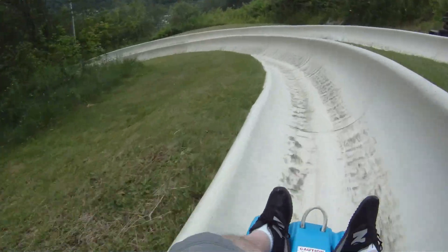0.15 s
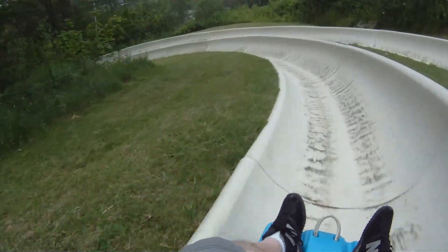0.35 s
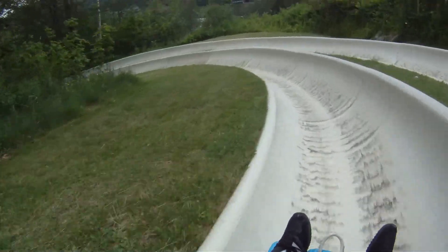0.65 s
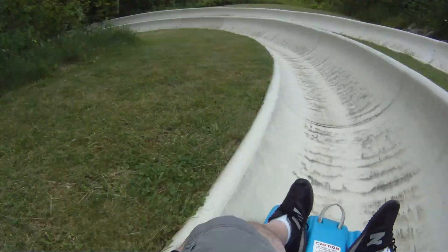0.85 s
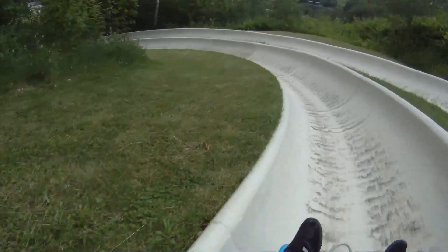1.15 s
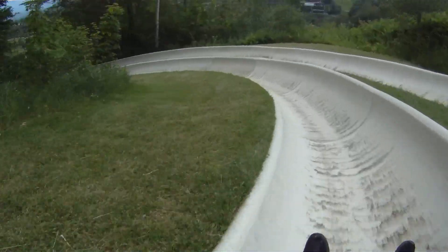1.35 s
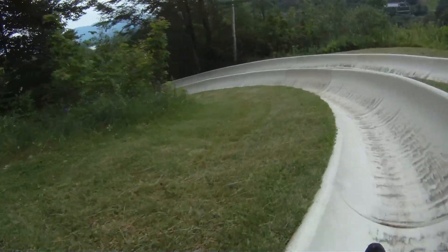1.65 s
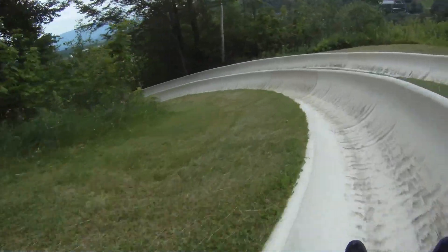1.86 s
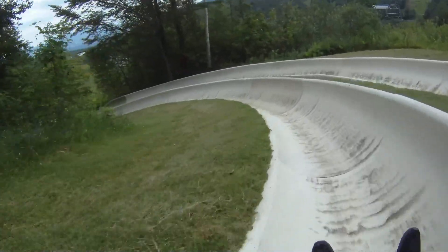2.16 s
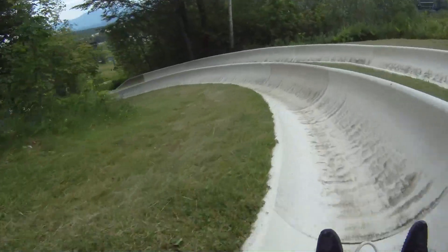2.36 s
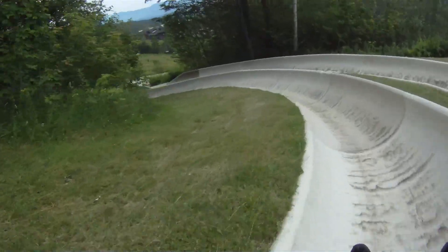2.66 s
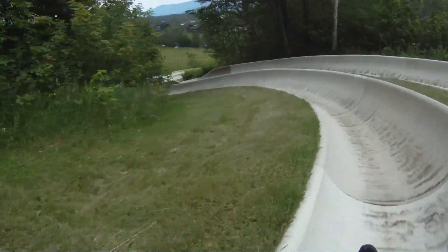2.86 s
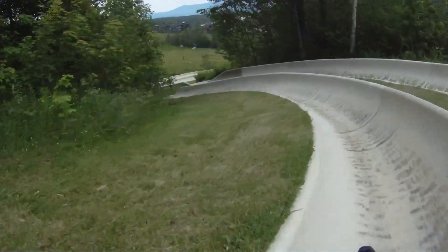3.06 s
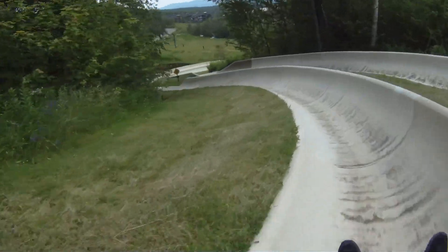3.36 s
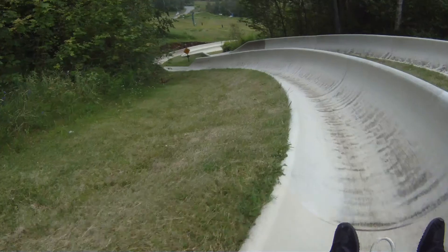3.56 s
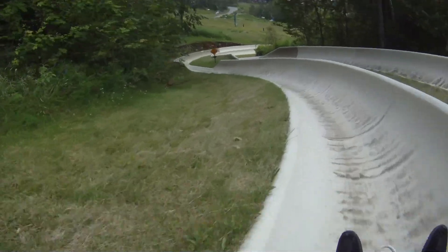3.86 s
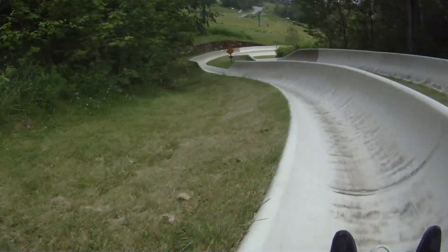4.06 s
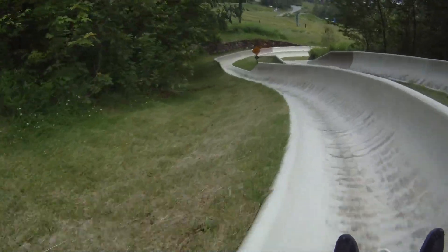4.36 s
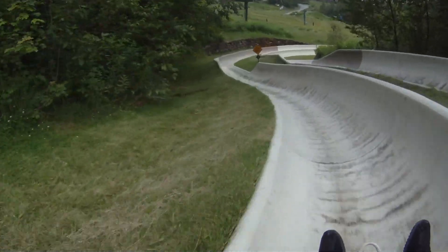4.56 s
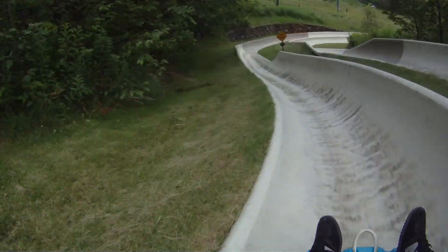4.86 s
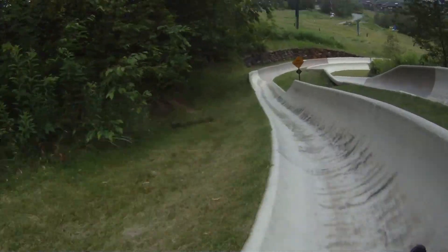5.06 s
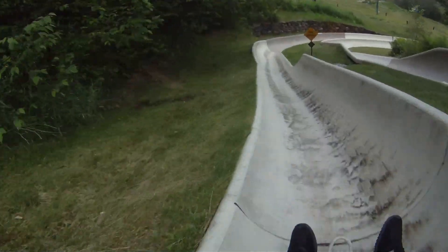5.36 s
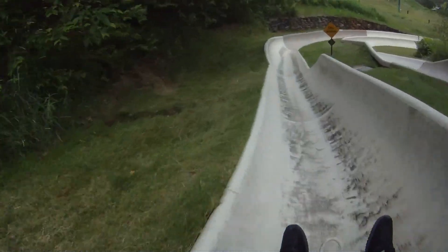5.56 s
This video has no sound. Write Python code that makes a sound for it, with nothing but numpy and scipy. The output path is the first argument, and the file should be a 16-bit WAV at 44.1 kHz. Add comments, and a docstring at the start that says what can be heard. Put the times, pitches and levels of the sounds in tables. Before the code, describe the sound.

A plastic sled scrapes along a concrete chute, knocking and clattering over evenly spaced joints.

```python
"""A plastic sled on a banked concrete chute in the open air, the microphone close, at the rider's seat.
From the start the runners scrape, coloured by the hollow shell. At each track joint, about 0.6 s apart,
the nose knocks; a tenth of a second later the tail thuds, the sled bounces and scrapes harder, and
loose parts clack. Grit ticks between the joints and three times a runner rubs the wall.
The last two knocks are softer, with no clacks after them."""
import sys
import numpy as np
from scipy import signal
from scipy.fft import rfft, irfft
from scipy.io import wavfile
from scipy.ndimage import uniform_filter1d

SR = 44100
rng = np.random.default_rng(int(sys.argv[2]) if len(sys.argv) > 2 else 0)


def generate_wav(sig):
    """Save sig (samples, or channels by samples) to the path in sys.argv[1] as 16-bit PCM at SR."""
    pcm = np.round(np.clip(np.atleast_2d(sig).T, -1, 1) * 32767).astype(np.int16)
    wavfile.write(sys.argv[1], SR, pcm)


N = 251370
TIME = np.arange(N) / SR
BLOW_T = np.arange(int(.2 * SR)) / SR  # time within one blow [s]

# the tail drops over a joint, levels relative:
# (time [s], thud [dB], rattle [dB], rattle pitch [Hz], bounce [dB])
TAIL_DROPS = [(0.123, -28.5, -33, 1920, -36.5), (0.732, -32, -42, 1880, -52),
              (1.414, -32, -34.5, 2100, -38.5), (2.069, -27.5, -31, 2000, -42.5),
              (2.695, -33.5, -37.5, 2160, -39.5), (3.306, -27.5, -28.5, 2170, -42.5),
              (3.895, -24.5, -33.5, 2470, -35.5), (4.483, -25, -28.5, 2520, -41.5),
              (5.192, -34.5, -30, 2490, -46), (5.679, -31.5, -39, 2120, -52)]


def nose_knocks(lag=0.0018, thud_db=-21, knock_db=-21, crack_db=-24, buzz_db=-25, thud_growth=1.65):
    """The nose hits each joint hard: the hollow modes ring, the shell cracks and the plastic buzzes."""
    # blows on the nose: (time [s], strength [dB re a typical joint])
    joints = [(0.014, -1), (0.644, -17), (1.307, 0.1), (1.968, 0), (2.597, 0), (3.211, 0.5), (3.802, 1.1),
              (4.39, 1.2), (5.008, -9.5), (5.586, -19.5)]
    out, shell = np.zeros(N), shell_response(ring_db=5.5)
    contact = 1 + .7 * np.exp(-(BLOW_T / .005) ** 4)  # strongest while the nose is still on the edge
    for s, db in joints:
        thud, knock = body_modes(contact_hz=1780, scatter=0.2, damping=0.79)
        thud = band(thud, 125, "high")  # the light nose hardly moves the whole sled
        crack = chatter(shell, rise=0.0018, t60=0.056, tail_db=-17, tail_t60=0.13, thin_hz=1180)
        buzz = chatter(shell, rise=0.0017, t60=0.074, tail_db=-8, tail_t60=0.077, thin_hz=387)
        buzz = undb(buzz_db) * unit_blow(band(buzz, 1230, "low"))
        strike = undb(knock_db) * unit_blow(contact * knock) + undb(crack_db) * unit_blow(contact * crack)
        thud_gain = undb(thud_db + thud_growth * db)  # only hard blows reach the low modes
        add(out, s + lag, thud_gain * thud + undb(db) * (strike + buzz))
    return out


def tail_thuds(lag=0.00063, rattle_lag=0.0022, knock_db=-19, hard_db=-29, hard_rise=0.0025):
    """The tail lands soft and heavy, damped by the rider; the seat shudders and the shell rattles."""
    out, shell = np.zeros(N), shell_response(ring_db=-4.5)
    for s, thud_db, rattle_db, hz, _ in TAIL_DROPS:
        thud, knock = body_modes(contact_hz=171, scatter=0.94, damping=1.44)
        shudder = chatter(shell, rise=0.0016, t60=0.17, tail_db=-20, tail_t60=0.14, thin_hz=79)
        shudder = unit_blow(band(shudder, 446, "low"))
        rise = hard_rise * 2 ** ((hard_db - rattle_db) / 8)  # 8 dB weaker builds half as fast
        rattle = chatter(shell, rise=rise, t60=0.063, tail_db=-14, tail_t60=0.15, thin_hz=770)
        rattle = tint(rattle, hz, boost_db=5)
        add(out, s + lag, undb(thud_db - 0.5) * thud + undb(thud_db - 4) * shudder)
        add(out, s + rattle_lag, undb(thud_db + knock_db) * knock + undb(rattle_db + 1.5) * rattle)
    return out


def clacks(lag=.0001, snap_hz=(2900, 5200), thud_db=-39, knock_db=-36, clack_db=-26.5, body_growth=0.41):
    """Loose parts land in light, bright chatter; the body's share grows more slowly than the blow."""
    # parts falling back: (time [s], strength [dB re a typical clack], pitch [Hz], snap boost [dB])
    falls = [(0.209, -6, 2280, 3.5), (0.232, -17, 1910, -16), (0.246, -10.5, 2190, 6),
             (0.825, -19, 2240, 1), (1.497, 0, 2130, -1.5), (1.536, -15.5, 2520, -11),
             (2.149, 5, 2270, -1.5), (2.771, 0, 2160, 3), (3.381, 0.5, 2240, -2.5), (3.969, 0.5, 1920, 2),
             (3.994, -10.5, 2230, -11), (4.559, -2, 2060, -1)]
    out, shell = np.zeros(N), shell_response(ring_db=-9)
    for s, db, hz, snap_db in falls:
        thud, knock = body_modes(contact_hz=920, scatter=1.0, damping=1.73)
        clack = chatter(shell, rise=0.0014, t60=0.044, tail_db=-26, tail_t60=0.49, thin_hz=1370)
        clack = tint(clack, hz, boost_db=5.5)
        clack = clack + (undb(snap_db) - 1) * band(clack, snap_hz, "band", order=1)
        body = undb(thud_db) * thud + undb(knock_db) * knock
        add(out, s + lag, undb(body_growth * db) * body + undb(clack_db + db) * clack)
    return out


def scrape(grains_per_s=380, grain_spread_db=3, split_hz=1600, press_growl_db=2, press_hiss_db=1.5):
    """Runners on rough concrete, just below the seat: coarse grains growl under a finer hiss."""
    # the slowly changing surface, levels relative: (time [s], growl [dB], hiss [dB])
    surface = [(0.0, -45, -47), (0.51, -48.5, -48), (1.33, -47.5, -48), (1.49, -49, -46),
               (3.08, -48.5, -48.5), (3.24, -46, -43.5), (3.48, -47.5, -49), (5.4, -47.5, -44),
               (5.7, -46, -47.5)]
    # the runners sing faintly: (pitch [Hz], width [Hz], boost [dB])
    runner_rings = [(2586, 56, 3), (3730, 70, 3), (5100, 320, 4)]
    s, growl_db, hiss_db = np.transpose(surface)
    shell = shell_response(ring_db=-48.5)
    hits = (rng.random(N) < grains_per_s / SR) * rng.choice([-1, 1], N)
    grains = unit(hits * undb(grain_spread_db * rng.exponential(size=N).clip(0, 4)))
    coarse = through(grains + undb(2.5) * rng.standard_normal(N), shell)
    fine = through(undb(-6) * grains + rng.standard_normal(N), shell)
    for hz, width, db in runner_rings:
        fine = tint(fine, hz, db, width)
    load_db = 1.03 * walk(24.75)  # the load on the runners flutters
    press = runner_press()
    growl_gain = undb(np.interp(TIME, s, growl_db) + 1 + press_growl_db * press + 0.65 * walk(61))
    hiss_gain = undb(np.interp(TIME, s, hiss_db) - 0.9 + press_hiss_db * press)
    growl = unit(band(coarse, split_hz, "low", order=3)) * growl_gain
    hiss = unit(band(fine, split_hz, "high", order=3)) * hiss_gain
    wall = wall_rubs(shell, split_hz)
    roughness_db = 1.14 * walk(90)  # the treble follows finer patches of the surface
    return (growl + (hiss + wall) * undb(roughness_db)) * undb(load_db)


def runner_press(full_db=-25.5):
    """Each tail drop briefly presses the runners onto the track, fully from a thud of full_db up."""
    return sum(min(undb(db - full_db), 1) * swell(s, attack=0.09, hold=0.033, release=0.058)
               for s, db, *_ in TAIL_DROPS)


def wall_rubs(shell, low_cut_hz, pitch_hz=2200):
    """Against the banked wall a runner rasps at a pitch of its own."""
    # brushes with the wall: (time [s], half length [s], level [dB])
    rubs = [(0.62, 0.045, -40.5), (0.853, 0.024, -41), (5.012, 0.079, -42.5)]
    rasp = band(through(rng.standard_normal(N), shell), low_cut_hz, "high")
    rasp = unit(tint(rasp, pitch_hz, boost_db=6, width_hz=490))
    return rasp * sum(undb(db) * np.exp(-((TIME - s) / half) ** 2) for s, half, db in rubs)


def grit(strays=120, stray_db=-42, stray_range_db=14, dull_hz=2600, bright_share=0.56):
    """Small ticks as the runners cross pits, with fainter stray grains between them."""
    # the clearest ticks under the runners: (time [s], level [dB])
    ticks = [(0.496, -46.5), (1.81, -43.5), (2.429, -43), (2.451, -42), (2.971, -42.5), (3.062, -37.5),
             (3.088, -44), (3.114, -44.5), (4.843, -44), (4.896, -42.5), (5.063, -41), (5.445, -41.5)]
    out, shell = np.zeros(N), shell_response(ring_db=-2)
    for s, db in ticks:
        tick = chatter(shell, rise=0.00033, t60=0.036, tail_db=-15, tail_t60=0.066, thin_hz=504)
        add(out, s, undb(db) * tick)
    for when, softness in rng.random((strays, 2)):
        tick = chatter(shell, rise=0.00035, t60=0.041, tail_db=-24, tail_t60=0.083, thin_hz=564)
        add(out, when * N / SR, undb(stray_db - stray_range_db * np.sqrt(softness)) * tick)
    return bright_share * out + (1 - bright_share) * band(out, dull_hz, "low", order=1)


def sway(low_hz=22, high_hz=35, rumble_db=-13, rumble_hz=105, lag=0.035, steady_db=-49):
    """The loaded sled bounces and rumbles after each tail drop, over a faint steady sway."""
    bounce = unit(band(rng.standard_normal(N), [low_hz, high_hz], "band", order=3))
    rumble = unit(band(rng.standard_normal(N), [low_hz, rumble_hz], "band"))
    jolts = sum(undb(db) * swell(s + lag, attack=0.039, hold=0.12, release=0.031)
                for s, *_, db in TAIL_DROPS)
    return (bounce + undb(rumble_db) * rumble) * np.hypot(undb(steady_db), jolts)


def body_modes(contact_hz, scatter, damping, split_hz=500, onset=0.00067):
    """One push rings the sled, as (thud, knock); scatter (0-1) is how unevenly blows land."""
    # low modes of the sled: (pitch [Hz], relative level [dB], t60 at damping 1 [s])
    modes = [(80, -33, 0.043), (117.8, -16.5, 0.15), (157, -2, 0.054), (236.4, -6, 0.081),
             (257.8, 1.5, 0.061), (268, -2, 0.013), (427, -13.5, 0.095), (542, -12, 0.046),
             (740, -3, 0.0082), (805, 7, 0.025), (1011, 2, 0.012), (1092, 1, 0.026), (1308, -1.5, 0.047),
             (1410, 2, 0.0061)]
    hz, db, t60 = np.transpose(modes)[:, :, None]
    size_luck, pitch_luck, phase_luck = scatter * rng.uniform(-1.29, 1, (3, len(modes), 1))
    size = undb(db + 8 * size_luck) / np.hypot(1, (hz / contact_hz) ** 2)  # soft contacts favour the bass
    fade = (1 - np.exp(-BLOW_T / onset)) * decay(t60 / damping)
    waves = size * fade * np.cos(2 * np.pi * hz * (1 + .06 * pitch_luck) * BLOW_T + 2 * phase_luck)
    low = hz[:, 0] < split_hz
    thud = band(waves[low].sum(0), 383, "low", order=3)
    knock = band(waves[~low].sum(0), [380, 1420], "band", order=4)
    return unit_blow(thud), unit_blow(knock)


def chatter(shell, rise, t60, tail_db, tail_t60, thin_hz):
    """A burst of tiny contacts that builds, dies fast and leaves a faint rattle in the shell."""
    build = 1 - np.exp(-(BLOW_T / rise) ** 2)
    fade = decay(t60) + undb(tail_db) * decay(tail_t60)
    contacts = rng.choice([-1, 1], len(BLOW_T)) * build * fade
    return unit_blow(through(band(contacts, thin_hz, "high"), shell))


def shell_response(ring_db, valley_db=-36, size=4096):
    """Impulse response of the plastic shell: broad resonances plus a share of its narrow rings."""
    # broad resonances: (centre [Hz], width [Hz], level [dB])
    resonances = [(87.5, 87, 4), (241, 165, 6), (457, 480, -2.5), (912, 430, 1.5), (1205, 291, 1),
                  (2034, 362, 0), (2475, 477, -1.5), (3505, 640, -9), (4590, 1140, -18.5), (7145, 910, -21),
                  (8405, 630, -15.5), (9630, 660, -11), (10760, 620, -20.5), (12600, 590, -22),
                  (14350, 630, -13)]
    # narrow rings that hard blows bring out: (centre [Hz], width [Hz], level [dB re ring_db])
    rings = [(2083, 110, 3), (2260, 70, -1), (2640, 70, -4), (3625, 90, -7), (8352, 90, -12),
             (9918, 130, -8), (10864, 90, -12), (11214, 100, -11), (11736, 40, -19), (12263, 45, -18),
             (12782, 100, -13), (13250, 100, -14), (14082, 130, -11), (14620, 100, -14)]
    f = np.arange(size // 2 + 1) * SR / size
    broad = sum(undb(db) ** 2 * .5 ** ((2 * (f - hz) / width) ** 2) for hz, width, db in resonances)
    narrow = sum(undb(db + ring_db) ** 2 / (1 + ((f - hz) / width) ** 2) ** 2 for hz, width, db in rings)
    cepstrum = irfft(np.log(undb(valley_db) ** 2 + broad + narrow) / 2)
    cepstrum[1:size // 2] *= 2  # folding the cepstrum makes the response causal
    cepstrum[size // 2 + 1:] = 0
    return irfft(np.exp(rfft(cepstrum)))


def tint(x, hz, boost_db, width_hz=330):
    """Each place of contact favours its own pitch."""
    peak = signal.lfilter(*signal.iirpeak(hz, hz / width_hz, fs=SR), x)
    return unit_blow(x + (undb(boost_db) - 1) * peak)


def swell(start, attack, hold, release):
    """An envelope that rises up to the start time, holds and dies away; all in seconds."""
    age = TIME - start
    return np.exp(np.minimum(age, 0) / attack - np.maximum(age - hold, 0) / release)


def decay(t60):
    """A blow's fade, 60 dB in t60 seconds."""
    return np.exp(-np.log(1000) * BLOW_T / t60)


def walk(rate_hz):
    """Smooth random wandering, rms 1."""
    k = int(SR / rate_hz)
    steps = np.repeat(rng.standard_normal(N // k + 1), k)
    return unit(uniform_filter1d(uniform_filter1d(steps, k), k)[:N])


def band(x, hz, kind, order=2):
    """Butterworth filter."""
    return signal.sosfilt(signal.butter(order, hz, kind, fs=SR, output="sos"), x)


def through(x, response):
    """Pass x through an impulse response."""
    return signal.fftconvolve(x, response)[:len(x)]


def undb(db):
    """Decibels to gain."""
    return 10 ** (np.asarray(db) / 20)


def unit(x):
    """Scale to rms 1."""
    return x / np.sqrt(np.mean(x ** 2))


def unit_blow(x):
    """Scale a blow to rms 1 over its first 30 ms."""
    return x / np.sqrt(np.mean(x[:int(.03 * SR)] ** 2))


def add(out, s, x):
    """Mix x in at time s."""
    i = max(int(s * SR), 0)
    out[i:i + len(x)] += x[:max(N - i, 0)]


def scene():
    """Mono, in the open air: every source rides with the microphone, so its distance holds."""
    return (nose_knocks() + tail_thuds() + clacks() + grit() + scrape() + sway())[None]


def record(dry):
    """The microphone at the seat rounds the very loudest peaks and cuts the top above 15.4 kHz."""
    rounded = dry / (1 + (dry / .9) ** 6) ** (1 / 6)
    return signal.sosfilt(signal.ellip(8, .2, 70, 15400, fs=SR, output="sos"), rounded)


dry = scene()
out = record(dry)
generate_wav(out)
```